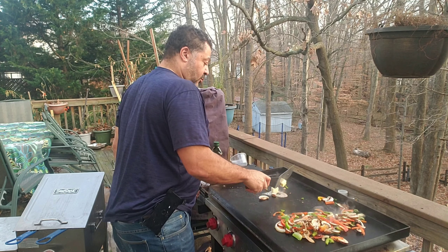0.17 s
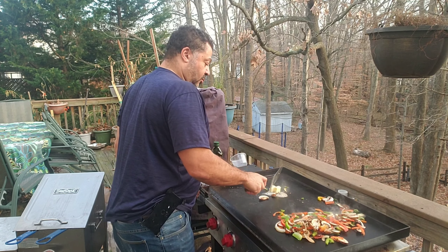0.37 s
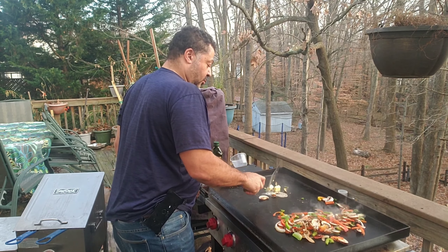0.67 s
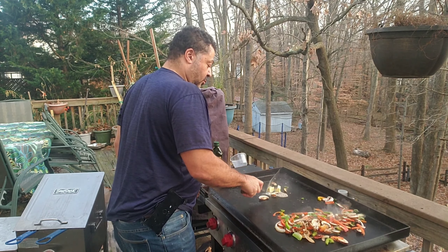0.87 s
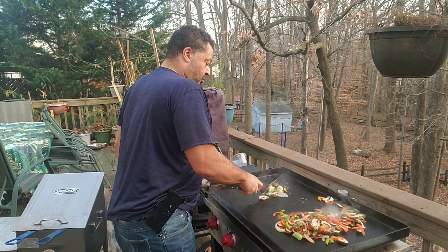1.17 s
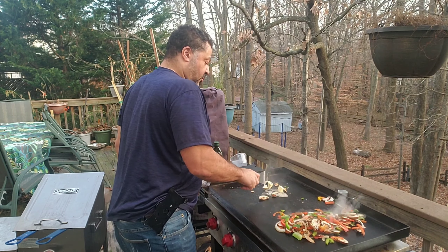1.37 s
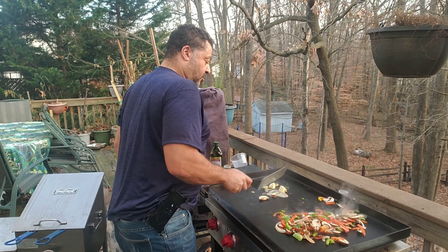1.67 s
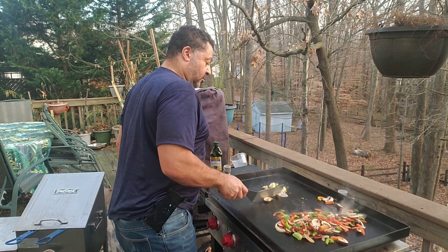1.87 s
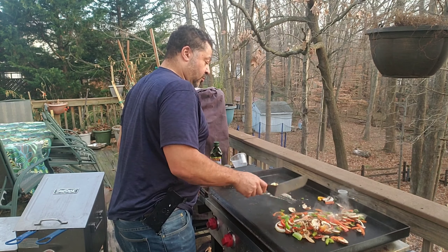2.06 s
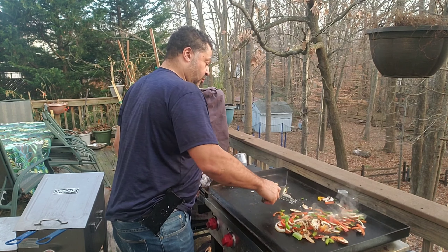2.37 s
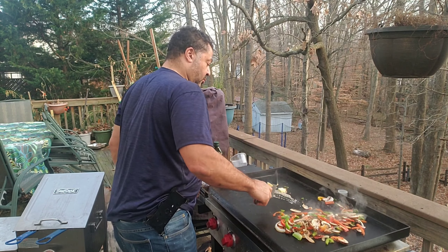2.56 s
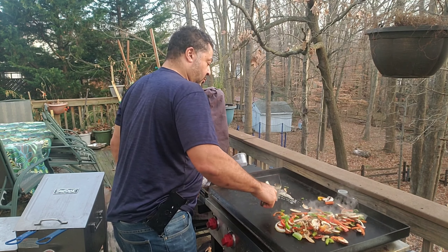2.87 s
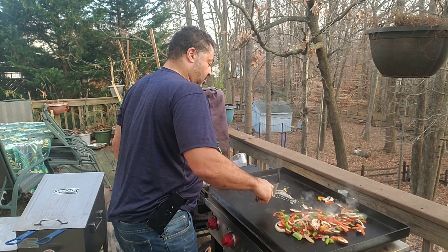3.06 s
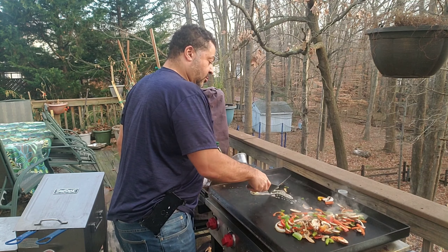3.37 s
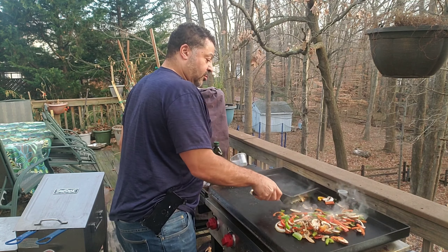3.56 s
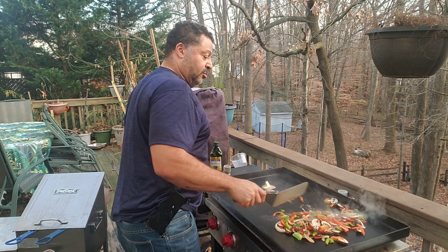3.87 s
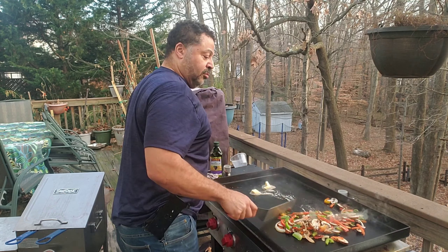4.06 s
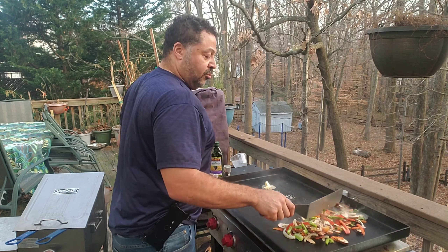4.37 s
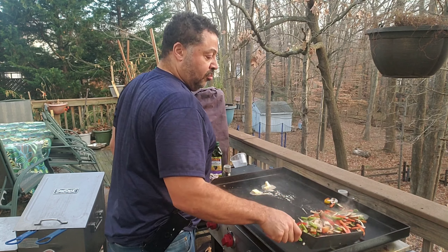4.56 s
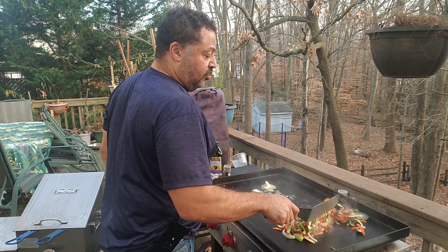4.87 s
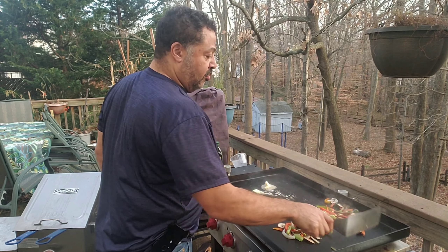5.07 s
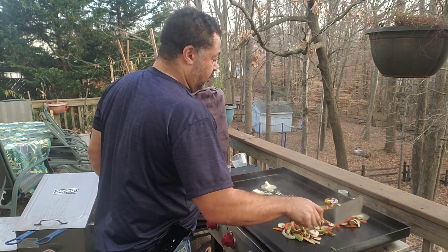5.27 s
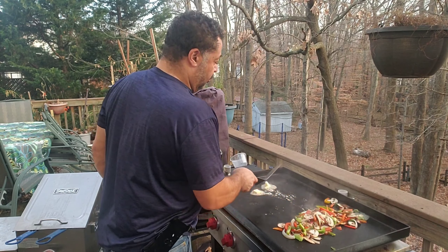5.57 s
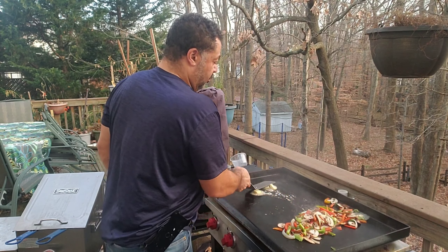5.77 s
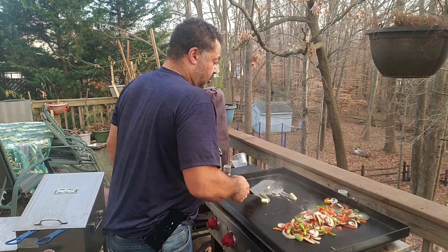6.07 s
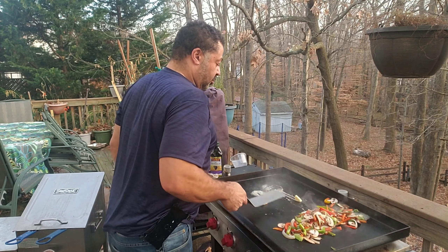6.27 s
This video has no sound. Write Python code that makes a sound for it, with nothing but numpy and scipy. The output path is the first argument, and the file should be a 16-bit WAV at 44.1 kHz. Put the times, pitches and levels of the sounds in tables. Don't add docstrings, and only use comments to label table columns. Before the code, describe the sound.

Outdoors on a deck, frying vegetables give a fine, bright, continuous sizzle, stronger to the left, over soft air and a faint traffic rumble. A spatula taps the thick griddle once, then chops with a click and scrapes. After a pause come a soft tap, short scrapes, and three louder ringing metal clanks. Fairly close stereo microphones, dry open space.

```python
import sys
import numpy as np
from scipy import signal
from scipy.io import wavfile

SR = 44100
rng = np.random.default_rng(int(sys.argv[2]) if len(sys.argv) > 2 else 0)


def voltage_ratio(decibels):
    exponent = np.asarray(decibels, float) / 20
    return 10 ** exponent


def dump(signal):
    limited = np.clip(np.atleast_2d(signal).T, -1, 1)
    pcm = np.round(limited * 32767).astype(np.int16)
    wavfile.write(sys.argv[1], SR, pcm)


N = 283122

# t/s, rumble level/dB
TRAFFIC = [
    (0.0, -41.5),
    (1.52, -42.5),
    (5.76, -47),
    (6.06, -45),
    (6.42, -47),
]
# f/Hz, level per Hz/dB
RUMBLE_SPECTRUM = [(13, -61), (22, -29), (27, -26), (35, -10), (41, -14), (64, 7), (96, -2), (124, -0.5),
                   (162, -15.5), (260, -19), (340, -10), (570, -120)]
AIR_SPECTRUM = [(120, -15.5), (200, -1), (248, -6), (343, -14), (392, -7), (557, -8.5), (690, -3),
                (1010, -3), (1200, -5.5), (1970, -8.5), (5000, -11), (6500, -23), (11000, -120)]
# t/s, hiss level/dB
FRY_LEVEL = [(0.0, -33.5), (1.91, -33), (2.88, -35), (3.65, -31), (3.79, -34), (4.13, -35), (4.27, -30.5),
             (4.67, -37), (4.81, -31), (5.67, -35.5), (6.22, -34.5), (6.42, -36)]
# f/Hz, level per Hz/dB
FRY_SPECTRUM = [(2060, -86), (3500, -12), (4050, -12.5), (4540, -16), (7270, -11.5), (8690, -13.5),
                (10900, -4.5), (13400, 1.5), (14800, -0.5), (15600, -2.5), (16000, -13)]
# f/Hz, left-right likeness
LIKENESS = [(60, 1), (130, 0.92), (290, 0.86), (640, 0.058), (1410, -0.051), (3100, -0.24), (6820, 0.01),
            (15000, 0.017)]
# f/Hz, left over right level/dB
LEFT_OVER_RIGHT = [(60, 1.5), (110, 1.0), (200, 2), (380, -1), (700, 1), (1290, 1), (2380, 0), (4400, 3),
                   (8120, 11.5), (15000, 8)]
# f/Hz, level per Hz/dB
PLATE_SPECTRUM = [(200, -6), (300, 0), (550, 5), (1000, 2.5), (1700, 4), (2600, 1.5), (3600, -0.5),
                  (4300, -7), (5200, -17), (7000, -13)]
EDGE_SPECTRUM = [(4000, -4), (6000, -10), (8000, -4.5), (9700, -9), (11200, 7.5), (13000, -1), (14500, 3.5),
                 (16500, -8)]
# f/Hz; then level/dB, t60/s
TAP_HZ = [312, 533, 586, 950, 1174, 1678, 2224, 2832, 3200, 3560]
TAP_LINES = [(-6, .55), (-7, .6), (-9, .5), (-11, .3), (-12, .5), (-5, .42), (-6, .27), (-13, .2),
             (-10, .15), (-12, .15)]
# f/Hz; then level/dB, t60/s
CHOP_HZ = [262, 533, 921, 1130, 1478, 1733, 1945, 2116, 2353, 2955, 3320, 3850]
CHOP_LINES = [(-9, .8), (-9, .6), (-12, .5), (-12, .4), (-10, .5), (-11, .5), (-13, .3), (-13, .35),
              (-14, .3), (-12, .25), (-13, .3), (-16, .2)]
# f/Hz; then level/dB, t60/s
RIM_HZ = [1012, 1750, 1954, 2315, 2412, 2482, 2800, 3060, 3316, 3600, 3930]
RIM_LINES = [(-10, .35), (-11, .3), (-11, .4), (-10, .3), (-13, .4), (-9, .2), (-10, .25), (-11, .25),
             (-11, .3), (-12, .25), (-15, .25)]
# f/Hz; then level/dB, t60/s
BLADE_HZ = [5620, 6580, 7710, 8355, 8484, 10275, 10510, 11130, 11430, 12040, 12415, 13300, 13740, 14375]
BLADE_LINES = [(-19, 0.22), (-24, .15), (-7, 0.075), (-12, 0.17), (-7, .22), (7.5, 0.075), (-17, .27),
               (-9.5, .3), (-10.5, 0.14), (-19, .1), (-4.5, .23), (-12, .3), (-12, .2), (7, 0.1)]
# start t/s, hardest t/s, end t/s, plate level/dB, blade level/dB
STROKES = [
    (1.941, 2.01, 2.10, -41, -31.5),
    (3.399, 3.48, 3.54, -46.5, -41),
    (3.517, 3.61, 3.63, -38.5, -53),
    (3.629, 3.68, 3.715, -37.5, -35),
    (3.702, 3.756, 3.81, -42.5, -29.5),
    (4.149, 4.172, 4.26, -41, -31),
    (4.716, 4.728, 4.83, -38.5, -31),
]
# t/s, peak level/dB, line f/Hz
TICKS = [(1.893, -9.5, 14400), (1.9834, -22, 14400), (1.999, -21, 12400), (2.038, -25, 13300),
         (2.05, -23, 13300), (3.729, -24, 14400), (3.749, -19, 12700), (4.642, -14, 14400),
         (4.7252, -19, 10500), (5.2124, -35, 13800), (5.234, -22, 14300)]
# t/s, plate level/dB, blade level/dB, plate tilt/(dB per octave), plate t60/s
BLOWS = [
    (1.124, -23, -33, 2.3, 0.61),
    (1.893, -26.5, -22, 4, 0.43),
    (3.359, -31, -49, 2, 0.74),
    (4.110, -22.5, -16, 3.5, 0.89),
    (4.64, -25, -14, 6, 0.96),
    (5.234, -21.5, -22.5, 4.5, 0.71),
]

RUN_IN = 8000
LONG, SHORT = 20000, 5000
RIGHT_LAG = 7
OPPOSED = np.array([[1], [-1]])
AIR_DB, AIR_FOLLOWS = -47.5, 0.32
LUMP_DB, LUMPS_PER_S = 0.5, 2.4
WASH_DB, WASH_T60_SHARE = -3, 0.77
TILT_TOP_HZ = 2660
TWIN_GAP, TWIN_DB = .015, -6
FLAP_LOW_HZ, FLAP_HIGH_HZ = 5000, 11000
FLAP_LOSS_DB_PER_S, LOOSE_T60_S = 66, 1
GRIP_DB = 5.5
RISE_DB, FALL_DB = 9.5, 20.5
PLATE_SWING, STROKE_GRIP_T60_S = 0.59, 0.59
TICK_T60_S, CRACK_T60_S = .055, .015
BLADE_T60_S, BLADE_T60_SHARE = 0.091, .14
SPREAD_S, SPREAD_SHARE = 0.0095, 0.42


def rms_one(x):
    return x / np.sqrt(np.mean(x ** 2) + 1e-20)


def at_hz(points, hz):
    points = np.array(points)
    return np.interp(np.log(hz), np.log(points[:, 0] + 1e-9), points[:, 1])


def level_in_time(rows):
    s, level_db = np.transpose(rows)
    return np.interp(np.arange(N) / SR, s, level_db)


def band_edges(spectrum, per_octave, margin):
    low, high = spectrum[0][0], spectrum[-1][0]
    return low * 2 ** np.arange(0, np.log2(high / low) + margin, 1 / per_octave)


def band_pass(low, high, x):
    return signal.sosfilt(signal.butter(2, [low, high], "band", fs=SR, output="sos"), x)


def drift(rate):
    r = np.exp(-80 * np.pi * rate / SR)
    white = rng.standard_normal(N // 40 + 2002)
    slow = signal.lfilter([1], [1, -2 * r, r * r], white)[2000:]
    return np.interp(np.arange(N) / 40, np.arange(len(slow)), rms_one(slow))


def grains(per_s, spread_db, size):
    sizes = voltage_ratio(spread_db * np.minimum(rng.exponential(1, size), 5))
    sizes = sizes * rng.choice([-1, 1], size)
    return rms_one(sizes * (rng.random(size) < per_s / SR))


def banded(white, spectrum, patchy_db, count):
    out, together = 0, drift(14.0)
    white = np.concatenate([white[..., -RUN_IN:], white], axis=2)
    edges = band_edges(spectrum, count, .2)
    edges = edges[at_hz(spectrum, edges) > -42]
    for k, (low, high) in enumerate(zip(edges, edges[1:])):
        mid, side = band_pass(low, high, white[k % 2])[:, RUN_IN:]
        hz = np.sqrt(low * high)
        alike = np.clip(at_hz(LIKENESS, hz), -1, 1)
        flicker_db = patchy_db * (0.2 * together + drift(4.0))
        gain = voltage_ratio(at_hz(spectrum, hz) + flicker_db)
        pair = np.sqrt(1 + alike) * mid + np.sqrt(1 - alike) * side * OPPOSED
        out = out + gain * pair * voltage_ratio(at_hz(LEFT_OVER_RIGHT, hz) / 2 * OPPOSED)
    return out / np.sqrt(np.mean(out.mean(0) ** 2))


def late(x):
    return np.r_[np.zeros(RIGHT_LAG), x[:-RIGHT_LAG]]


def ring(hz, level_db, t60, alike, size):
    t = np.arange(size) / SR
    hz = np.c_[hz]
    lean_db = np.c_[at_hz(LEFT_OVER_RIGHT, hz)] / 2
    fade = voltage_ratio(np.c_[level_db] - 60 * t / np.c_[t60])
    unlike = (1 - np.clip(alike, 0, 1)) * np.minimum(hz / 1500, 1)
    turn = unlike * np.pi * rng.uniform(-1.26, 1, hz.shape)
    left = (fade * voltage_ratio(lean_db) * np.sin(2 * np.pi * hz * t)).sum(0)
    right = (fade * voltage_ratio(-lean_db) * np.sin(2 * np.pi * hz * t + turn)).sum(0)
    return np.array([left, late(right)])


def dense(spectrum, t60, alike, tilt_db, size):
    t = np.arange(size) / SR
    white, out = rng.standard_normal((2, 2, size)), 0
    edges = band_edges(spectrum, 4, .1)
    middle_hz = edges[len(edges) // 2]
    for k, (low, high) in enumerate(zip(edges, edges[1:])):
        hz = np.sqrt(low * high)
        octaves = np.log2(hz / middle_hz)
        level_db = at_hz(spectrum, hz) + tilt_db * min(octaves, np.log2(TILT_TOP_HZ / middle_hz))
        fade = voltage_ratio(level_db - 60 * t / t60 * 2 ** (0.07 * octaves))
        left, other = band_pass(low, high, white[k % 2] * fade)
        same = np.clip(alike, .01, 1) ** min(hz / 1500, 1)
        right = same * late(left) + np.sqrt(1 - same ** 2) * other
        out = out + np.array([left, right]) * voltage_ratio(at_hz(LEFT_OVER_RIGHT, hz) / 2 * OPPOSED)
    return out / np.sqrt(np.mean(out[:, 40:600] ** 2))


def plate_ring(hz, lines, t60, tilt_db, size):
    level_db, line_t60 = np.transpose(lines)
    tilt = tilt_db * np.log2(np.minimum(hz, TILT_TOP_HZ) / 1200)
    level_db = level_db + tilt + rng.normal(0, 1.5, len(hz))
    wash = voltage_ratio(WASH_DB) * dense(PLATE_SPECTRUM, WASH_T60_SHARE * t60, 0.22, tilt_db, size)
    twins = np.array(hz) * (1 + TWIN_GAP * rng.standard_normal(len(hz)))
    line_t60 = np.minimum(np.r_[line_t60, .7 * line_t60], 1.05 * t60)
    pair_db = np.r_[level_db - 1, level_db + TWIN_DB]
    return wash + ring(np.r_[hz, twins], pair_db, line_t60, 0.29, size)


def gripped(plate_t60):
    hz, (level_db, t60) = np.array(BLADE_HZ), np.transpose(BLADE_LINES)
    flap = (hz > FLAP_LOW_HZ) & (hz < FLAP_HIGH_HZ)
    loss_db = FLAP_LOSS_DB_PER_S * max(LOOSE_T60_S - plate_t60, 0)
    chance_db = GRIP_DB * rng.standard_normal(len(hz))
    return np.c_[hz, level_db - flap * loss_db + chance_db, t60]


def blade_ring(lines, t60, size):
    hz, level_db, line_t60 = np.transpose(lines)
    crack = dense(EDGE_SPECTRUM, t60, 0.11, 0, size)
    return crack + ring(hz, .8 * level_db + .5, np.minimum(line_t60, 0.72 * t60), 0.99, size)


def yard():
    rumble_db = level_in_time(TRAFFIC)
    air_db = AIR_DB + AIR_FOLLOWS * (rumble_db - rumble_db.mean())
    rumble = banded(rng.standard_normal((2, 2, N)), RUMBLE_SPECTRUM, patchy_db=-1.5, count=3)
    air = banded(rng.standard_normal((2, 2, N)), AIR_SPECTRUM, patchy_db=0.56, count=3)
    return voltage_ratio(rumble_db + LUMP_DB * drift(LUMPS_PER_S)) * rumble + voltage_ratio(air_db) * air


def frying():
    spits = grains(7000, 3.0, size=(2, 2, N)) * voltage_ratio(.9 * drift(150))
    pops = .12 * grains(60, 3.0, size=(2, 2, N))
    hiss = .9 * rng.standard_normal((2, 2, N))
    return voltage_ratio(level_in_time(FRY_LEVEL)) * banded(spits + pops + hiss, FRY_SPECTRUM, patchy_db=.5, count=6)


def strokes():
    out = np.zeros((2, N))
    for start_s, hard_s, end_s, plate_db, blade_db in STROKES:
        start, size = round(start_s * SR), round((end_s - start_s) * SR)
        away = np.interp(start_s + np.arange(size) / SR, [start_s, hard_s, end_s], [-1, 0, 1])
        push_db = -np.where(away < 0, RISE_DB, FALL_DB) * away ** 2
        slips = grains(3000, 2.4, size=SR // 4)[:size] * voltage_ratio(1.3 * drift(60)[:size])
        plate = plate_ring(CHOP_HZ, CHOP_LINES, .07, 1.0, SHORT)
        blade = blade_ring(gripped(STROKE_GRIP_T60_S), .03, SHORT)
        levels_db = plate_db + PLATE_SWING * push_db, blade_db + push_db
        for level_db, body in zip(levels_db, (plate, blade)):
            body = body / np.sqrt(np.sum(body.mean(0) ** 2))
            sound = signal.fftconvolve(body, (voltage_ratio(level_db) * slips)[None], axes=1)
            out[:, start:start + sound.shape[1]] += sound
    return out


def ticks():
    out = np.zeros((2, N))
    for s, peak_db, hz in TICKS:
        click = 0.54 * dense(EDGE_SPECTRUM, CRACK_T60_S, 0.35, 0, SHORT)
        sound = click + ring(np.array([hz]), [-3.0], [TICK_T60_S], .3, SHORT)
        start = round(s * SR)
        out[:, start:start + SHORT] += voltage_ratio(peak_db - 11.5) * sound
    return out


def struck_spot(k):
    if k in (0, 2):
        return TAP_HZ, TAP_LINES
    if k == 5:
        return RIM_HZ, RIM_LINES
    return CHOP_HZ, CHOP_LINES


def blows():
    out = np.zeros((2, N + SR))
    t = np.arange(LONG) / SR
    for k, (s, plate_db, blade_db, tilt_db, plate_t60) in enumerate(BLOWS):
        blade_t60 = BLADE_T60_S + BLADE_T60_SHARE * plate_t60
        plate = plate_ring(*struck_spot(k), plate_t60, tilt_db, LONG)
        plate = plate * (1 + 0.43 * np.exp(-t / 0.0068) - SPREAD_SHARE * np.exp(-t / SPREAD_S))
        chatter = voltage_ratio(drift(300)[:LONG] * np.exp(-t / 0.014))
        swell = 1 - np.exp(-t / (0.16 * blade_t60 ** 2))
        blade = blade_ring(gripped(plate_t60), blade_t60, LONG) * swell * chatter
        start = round(s * SR)
        out[:, start:start + LONG] += voltage_ratio(plate_db - 3) * plate + voltage_ratio(blade_db - 3) * blade
    return out[:, :N]


def scene():
    return yard() + frying() + strokes() + ticks() + blows()


def roll_off(x):
    return signal.sosfilt(signal.butter(12, 16660, fs=SR, output="sos"), x)


def record(dry):
    low_pass = signal.ellip(12, .5, 75, 15500, fs=SR, output="sos")
    mix = signal.sosfilt(low_pass, dry)
    return roll_off(mix)


dry = scene()
out = record(dry)
dump(out)
```